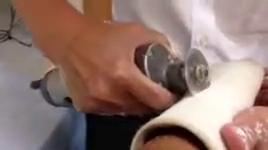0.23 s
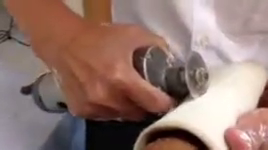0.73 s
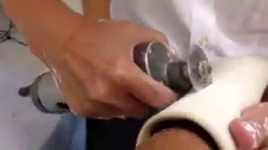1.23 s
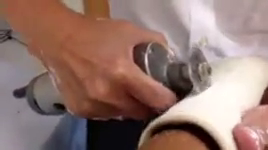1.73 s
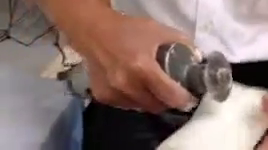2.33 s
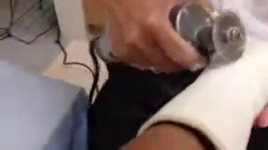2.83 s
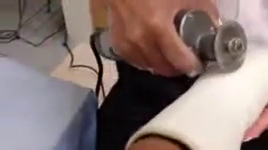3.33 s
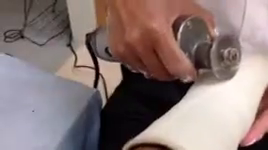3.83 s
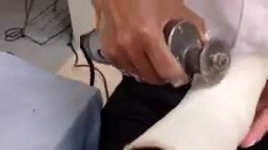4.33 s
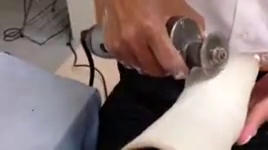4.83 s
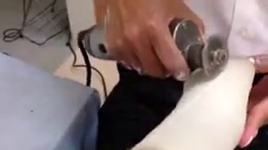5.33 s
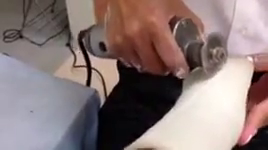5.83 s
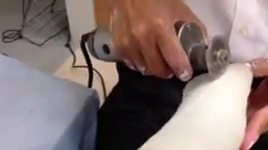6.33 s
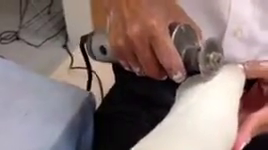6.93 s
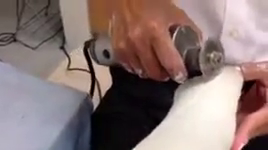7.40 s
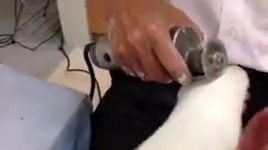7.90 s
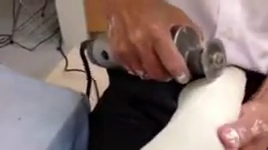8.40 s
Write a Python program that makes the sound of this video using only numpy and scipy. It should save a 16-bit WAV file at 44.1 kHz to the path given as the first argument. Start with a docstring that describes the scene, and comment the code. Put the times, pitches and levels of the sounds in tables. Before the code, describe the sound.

A small electric saw buzzes harshly through plaster in several presses, lifts into a bright ringing whine, then bites again with stuttering rasps.

```python
"""A buzzing rasp cuts plaster in several presses; between two of them the saw whines and its blade rings free.
A motor rocks a small blade to and fro some 150-285 times a second and slows under load. Each stroke scrapes
the plaster (a burst of gritty noise) and knocks in the drive (wavering partials). The cast hums at the stroke
rate, narrow resonances sing for a moment, and the lifted saw adds drive tones, blade modes and more rumble."""
import sys
import numpy as np
from scipy import signal
from scipy.fft import rfft, irfft
from scipy.io import wavfile
from scipy.ndimage import uniform_filter1d

SR = 44100
rng = np.random.default_rng(int(sys.argv[2]) if len(sys.argv) > 2 else 0)


def pcm_store(signal):
    """Save signal as 16-bit PCM."""
    levels = np.round(np.clip(np.atleast_2d(signal), -1, 1) * 32767)
    wavfile.write(sys.argv[1], SR, levels.astype(np.int16).T)


N = 381895

# Saw clear of the cast: less shake, smoother rasp, more rumble
LIFT_S, LOWER_S = 2.12, 4.3
LIFTED_SHAKE_DB, LIFTED_GRIT_SHARE, LIFTED_RUMBLE_DB = -7, 0.6, 3
PRESSED_RUMBLE_DB = -4   # at share 1: a firm bite damps the housing


def from_db(db):
    """Decibels to amplitude factor."""
    return 10 ** (np.asarray(db) / 20)


def rms_one(x):
    """Scale to rms 1 over the whole signal."""
    return x / np.sqrt(np.mean(x ** 2) + 1e-20)


def evened(x):
    """Level held near rms 1 over about a fifth of a second."""
    power = uniform_filter1d(uniform_filter1d(x ** 2, size=6000), size=6000)
    return x / np.sqrt(power + 1e-20)


def in_time(rows):
    """Interpolate each column of a table over its first, the time in s."""
    s, *columns = np.transpose(rows)
    return [np.interp(np.arange(N) / SR, s, c) for c in columns]


def gate(start_s, end_s):
    """Comes on from start_s, holds until end_s, then eases off; 0-1."""
    attack_s, release_s = 0.06, 0.06
    t = np.arange(N) / SR
    return np.clip(np.minimum((t - start_s) / attack_s, (end_s - t) / release_s + 1), 0, 1)


def bumps(events, width_s):
    """Short Gaussian swells in dB; overlapping ones add."""
    t = np.arange(N) / SR
    return sum(db * np.exp(-((t - s) / width_s) ** 2) for s, db in events)


def drift(rate_hz, count=1):
    """Slow chance: noise at every 64th sample through a double one-pole low-pass; spread 1."""
    r = np.exp(-128 * np.pi * rate_hz / SR)
    noise = rng.standard_normal((count, N // 64 + 1002))
    slow = signal.lfilter([1], [1, -2 * r, r * r], noise)[:, 1000:]   # drop the filter's run-in
    return [np.interp(np.arange(N) / 64, np.arange(len(row)), rms_one(row)) for row in slow]


def resonance(x, hz, width_hz):
    """A resonance with steep skirts: the same pole pair, width_hz wide, twice."""
    r = np.exp(-np.pi * width_hz / SR)
    section = [(1 - r * r) / 2, 0, (r * r - 1) / 2, 1, -2 * r * np.cos(2 * np.pi * hz / SR), r * r]
    return signal.sosfilt([section, section], x)


def coloured(x, tilt_db):
    """The broad resonances of saw and cast, tilted by tilt_db an octave above 1 kHz."""
    # response of saw and cast: (frequency [Hz], level [dB])
    colour = [(90, -25), (300, -34), (700, -16), (1150, -10), (1650, -5), (2200, -6), (3100, -5.5),
              (3600, 6), (4100, 7), (4800, 8), (6000, -1.5), (6800, 2.5), (8200, -6), (10300, -10.5),
              (12600, -23.5), (14400, -19), (15300, -25)]
    hz = np.maximum(np.arange(N // 2 + 1) * SR / N, 1)
    point_hz, point_db = np.transpose(colour)
    db = np.interp(np.log(hz), np.log(point_hz), point_db)
    db = db + tilt_db * np.log2(np.maximum(hz / 1000, 1))
    return irfft(rfft(x) * from_db(db), N)


def rumble():
    """Dull noise of the motor housing and the room, its level wavering slowly."""
    low_hz, high_hz, level_db = 127, 490, -45.5
    band = signal.butter(3, [low_hz, high_hz], "band", fs=SR, output="sos")
    swell = from_db(level_db + 1.5 * drift(2.9)[0])
    return swell * rms_one(signal.sosfilt(band, rng.standard_normal(N)))


def hand():
    """Pressure of the hand: each press comes on, holds and eases off; loose values hold in between."""
    # presses of the blade; in the fourth row the drive knocks evenly as the lifted saw spins up:
    # (start [s], end [s], share of regular knock [0-1], body of the cast [dB], shake at the stroke rate [dB],
    #  shake at its overtones [dB], topmost hiss against the treble [dB])
    presses = [(-.1, 0.35, 0.74, -24, -32.5, -39.5, -0.5), (0.385, 1.405, 0.6, -24, -36, -39, -4),
               (1.41, 2.04, 0.46, -24.5, -34.5, -44.5, -6), (2.307, 2.856, 0.62, -26, -40.5, -47, -2.5),
               (4.35, 4.94, 0.33, -24.5, -46, -51.5, -1.5), (5.06, 5.808, .88, -21.5, -40.5, -38, -1.5),
               (6.12, 6.913, 0.83, -24.5, -41, -43.5, -3), (7.244, 7.704, 0.81, -26, -48.5, -39, -6.5),
               (7.808, 8.49, 0.58, -26.5, -48, -53, -0.5), (8.486, 8.8, 0.56, -21, -35, -45, -3.5)]
    # blade barely touching: share, body dB, shake dB, overtones dB, hiss dB
    loose = np.array([0.31, -26, -47, -50.5, -2])
    out = loose[:, None] * np.ones(N)
    for start_s, end_s, *firm in presses:
        out += np.outer(firm - loose, gate(start_s, end_s))
    return out


def whine(phase, whine_db, low_db):
    """Odd multiples of the stroke rate stand out as tones, the upper ones wavering."""
    # upper tones of the drive: (multiple of the stroke rate [-], level [dB])
    drive_tones = [(13, -1), (15, -4), (17, 0), (19, -9)]
    low_multiple = 5
    swell, slip = drift(6.0, count=len(drive_tones)), drift(1.8, count=len(drive_tones))
    tones = np.zeros(N)
    for (k, db), a, b in zip(drive_tones, swell, slip):
        tones += from_db(db + 1.5 * a) * np.cos(k * phase + 0.8 * b)
    low = from_db(low_db) * np.cos(low_multiple * phase)
    return np.sqrt(2) * (from_db(whine_db) * tones + low)


def free_blade(ring_db):
    """Rattle in the drive keeps the modes of the undamped steel disc ringing."""
    # modes of the disc: (frequency [Hz], width of each pole pair [Hz], level [dB])
    modes = [(6670, 90, -4), (8690, 110, -13), (10000, 90, -8), (10480, 170, 0), (13550, 70, -21),
             (13930, 90, -22)]
    rattle = rng.standard_normal(N) * from_db(1.4 * drift(7.5)[0])
    ring = sum(from_db(db) * resonance(rattle, hz, width_hz) for hz, width_hz, db in modes)
    return from_db(ring_db) * rms_one(ring)


def singing(phase):
    """One even tick a stroke rings a narrow resonance of blade or cast while it lasts."""
    # moments of singing: (start [s], end [s], frequency [Hz], level [dB])
    sings = [(-.1, 0.28, 5040, -20.5), (-.1, 0.208, 3810, -18), (0.053, .38, 6860, -23.5),
             (-.1, .38, 1630, -31), (0.54, 0.656, 4860, -16), (1.05, 1.355, 1630, -28),
             (1.18, 1.3, 4800, -20), (2.08, 2.3, 4470, -23), (2.174, 2.444, 3680, -26),
             (2.42, 2.64, 4520, -27), (2.454, 2.647, 2805, -33), (2.728, 2.803, 1800, -26.5),
             (4.7, 4.8, 3970, -25.5), (4.626, 4.9, 1850, -31), (5.097, 5.453, 2495, -28),
             (5.45, 5.796, 4040, -24.5), (5.51, 5.793, 5060, -22), (6.16, 6.5, 4560, -38),
             (7.313, 7.486, 3640, -20), (7.368, 7.638, 1470, -27.5), (7.547, 7.653, 2620, -30),
             (7.853, 8.02, 4320, -28), (8.096, 8.555, 1794, -33), (8.48, 8.6, 3730, -27)]
    width_hz = 166
    ticks = np.diff(np.floor(phase / (2 * np.pi)), prepend=0) + 1e-18
    return sum(from_db(db) * gate(start_s, end_s) * rms_one(resonance(ticks, hz, width_hz))
               for start_s, end_s, hz, db in sings)


def shake(phase, rate, stroke_db, overtones_db):
    """The cast hums at the stroke rate and its first overtones, each wavering a little."""
    # answer of the cast to the overtones: (frequency [Hz], level [dB])
    cast_answer = [(300, -10.5), (440, 5.5), (520, -2), (620, -5.5), (800, -17.5)]
    housing_hz, housing_width_hz, housing_db = 798, 47, -45   # every overtone here passes through it
    answer_hz, answer_db = np.transpose(cast_answer)
    waver = drift(10.6, count=5)
    out = from_db(stroke_db + 2.0 * waver[0]) * np.sin(phase)
    for k in range(2, 6):
        answer = np.interp(np.log(k * rate), np.log(answer_hz), answer_db)
        cast = from_db(overtones_db + answer) * (k < 4)   # the cast answers multiples 2 and 3 only
        housing = from_db(housing_db) * np.exp(-((k * rate - housing_hz) / housing_width_hz) ** 2)
        out += (cast + housing) * from_db(2.0 * waver[k - 1]) * np.sin(k * phase)
    return np.sqrt(2) * out


def knocks(phase, wander, smear, count):
    """One knock a stroke, as partials that fade and slip slowly because no two strokes bite alike."""
    swell, slip = drift(10.4, count=count), drift(2.62, count=count)
    turn = np.exp(1j * (phase + 0.023 * drift(19.0)[0]))   # timing jitter blurs the high partials most
    out, partial = np.zeros(N), turn ** 3
    for k in range(4, count):
        partial = partial * turn
        slipped = (partial * np.exp(1j * smear * slip[k])).real
        out -= (1 + np.tanh(wander * swell[k])) * slipped
    return out


def scrape(phase, depth, grit_db, flutter_db):
    """Teeth on plaster: gritty noise in one burst a stroke, each moment a little louder or softer."""
    low_cut = signal.butter(1, 600, "high", fs=SR, output="sos")   # little bass
    burst = np.exp(depth * np.cos(phase))
    grit = from_db(grit_db * drift(80.0)[0] + flutter_db * drift(18.0)[0])
    return signal.sosfilt(low_cut, burst * grit * rng.standard_normal(N))


def rasp(phase, share, body_db, hiss_db, lifted):
    """Knocks and scrape, coloured by saw and cast, then split into four ranges with their own levels."""
    # the rasp: (time [s], level of the teeth [dB], level of the treble [dB])
    rasp_levels = [(0.0, -17, -26), (0.17, -15.5, -25), (0.24, -17.5, -24), (1.49, -19, -26),
                   (1.64, -29.5, -35.5), (1.69, -20.5, -29.5), (1.91, -20, -31.5), (2.72, -17, -23.5),
                   (2.87, -17, -27.5), (4.03, -17, -24.5), (4.56, -19, -24), (4.75, -20, -29.5),
                   (4.99, -21.5, -23.5), (5.76, -17.5, -20.5), (5.86, -25, -30), (6.22, -17, -22),
                   (6.8, -23, -26.5), (6.87, -18, -25), (6.92, -31.5, -36), (7.04, -23, -31),
                   (7.31, -26, -28), (7.35, -18, -21), (7.62, -20.5, -21.5), (7.72, -25.5, -32.5),
                   (8.1, -22, -32.5), (8.66, -18.5, -25.5)]
    # the blade skips and catches again: (time [s], swell [dB])
    catches = [(5.03, 10.5), (7.83, 5.5), (7.91, 9), (7.95, 9), (7.99, 4), (8.05, 6), (8.16, 6), (8.235, 9),
               (8.3, 8.5), (8.35, 5)]
    # edges between body, middle, sizzle and hiss: (frequency [Hz])
    band_edges_hz = [3100, 6000, 11500]
    catch_s = 0.0091
    level_db, treble_db = in_time(rasp_levels)
    share = np.clip(share, 0, 1)
    drive = knocks(phase, wander=0.85, smear=0.8, count=60)
    mix = np.sqrt(share) * rms_one(coloured(drive, tilt_db=-0.73))
    # the firmer the bite, the more the scrape bunches into one burst a stroke
    flutter_db = 2.2 * (1 - LIFTED_GRIT_SHARE * lifted)
    teeth = scrape(phase, depth=0.85 * share, grit_db=1.6, flutter_db=flutter_db)
    mix += np.sqrt(1 - share) * rms_one(coloured(teeth, tilt_db=1.5))

    spectrum, hz = rfft(mix), np.arange(N // 2 + 1) * SR / N
    below = [0] + [1 / (1 + (hz / edge) ** 8) for edge in band_edges_hz] + [1]
    bands = [evened(irfft(spectrum * (b - a), N)) for a, b in zip(below, below[1:])]
    body, middle, sizzle, hiss = bands
    treble = from_db(treble_db) * (sizzle + from_db(hiss_db) * hiss)
    middle_db = level_db + bumps(catches, catch_s)
    return from_db(body_db) * body + from_db(middle_db) * middle + treble


def scene():
    """One stroke phase drives cutting and whine; hand pressure and lifting set the levels."""
    # motor, slower under load: (time [s], stroke rate [strokes/s])
    speed = [(0.0, 168.8), (0.07, 167.2), (0.41, 151.6), (0.55, 152.2), (0.7, 156.7), (1.01, 153.7),
             (1.28, 167.6), (1.37, 168.7), (2.36, 238.1), (2.58, 251.0), (2.94, 265.0), (3.26, 273.3),
             (3.83, 282.8), (4.34, 284.2), (5.23, 253.0), (5.72, 216.8), (5.79, 213.1), (6.12, 225.4),
             (6.29, 221.4), (6.85, 185.4), (7.11, 206.8), (7.28, 210.2), (7.69, 202.6), (8.05, 221.0),
             (8.32, 225.0), (8.49, 224.1), (8.66, 215.7)]
    # running free: (time [s], ring of the blade [dB], whine of the drive [dB], its low tone [dB])
    free_levels = [(1.8, -48, -60, -56), (2.2, -26, -42, -39), (2.6, -18.5, -40, -40), (2.9, -15, -18, -31),
                   (3.5, -17, -18.5, -28), (3.9, -16.5, -17, -29), (4.2, -23, -20, -31),
                   (4.4, -30, -26, -27), (4.8, -31, -39, -26.5), (5.2, -53, -73, -42)]
    rate, = in_time(speed)
    share, body_db, stroke_db, overtones_db, hiss_db = hand()
    ring_db, whine_db, low_db = in_time(free_levels)
    lifted = gate(LIFT_S, LOWER_S)
    phase = 2 * np.pi * np.cumsum(rate) / SR

    shake_db = LIFTED_SHAKE_DB * lifted
    hum = shake(phase, rate, stroke_db + shake_db, overtones_db + shake_db)
    cutting = rasp(phase, share, body_db, hiss_db, lifted) + hum + singing(phase)
    free = free_blade(ring_db) + whine(phase, whine_db, low_db)
    rumble_db = LIFTED_RUMBLE_DB * lifted + PRESSED_RUMBLE_DB * share
    return (cutting + free + from_db(rumble_db) * rumble())[None]


def record(dry):
    """A small microphone with little bass; peaks are rounded, the top is cut."""
    low_hz, cutoff_hz = 102, 15300
    low_cut = signal.butter(3, low_hz, "high", fs=SR, output="sos")
    thin = signal.sosfilt(low_cut, np.tanh(dry / 1.153))
    return signal.sosfilt(signal.ellip(14, 0.5, 70, cutoff_hz, fs=SR, output="sos"), thin)


dry = scene()
out = record(dry)
pcm_store(out)
```